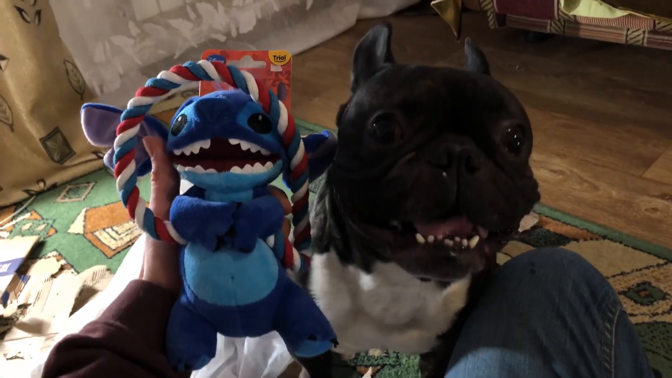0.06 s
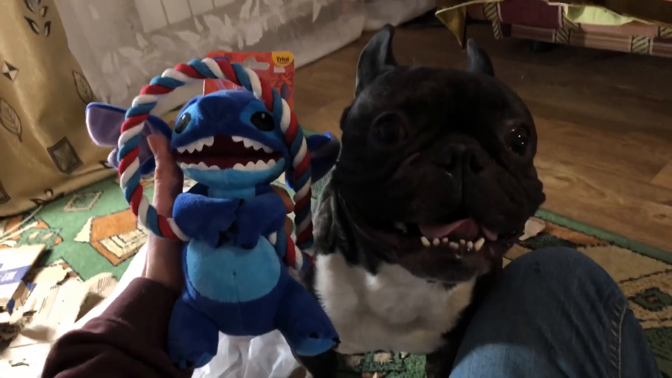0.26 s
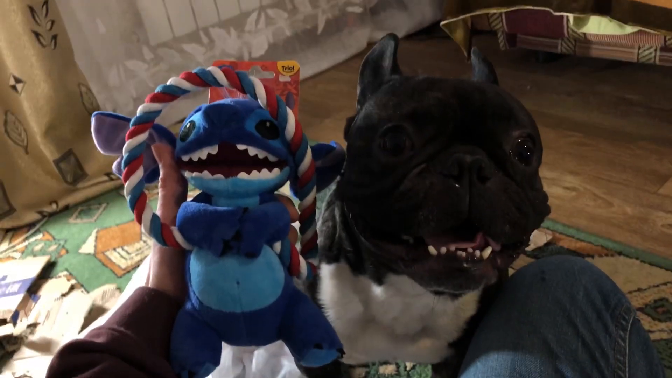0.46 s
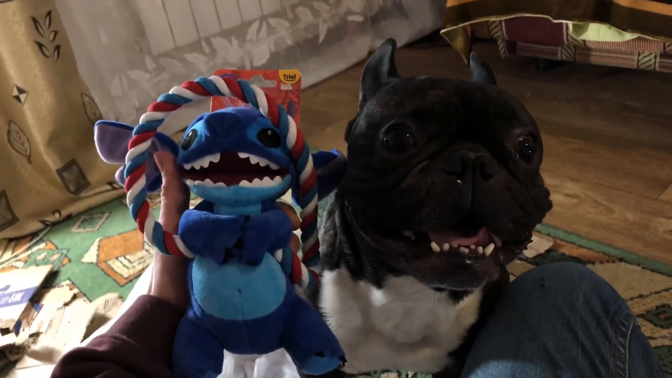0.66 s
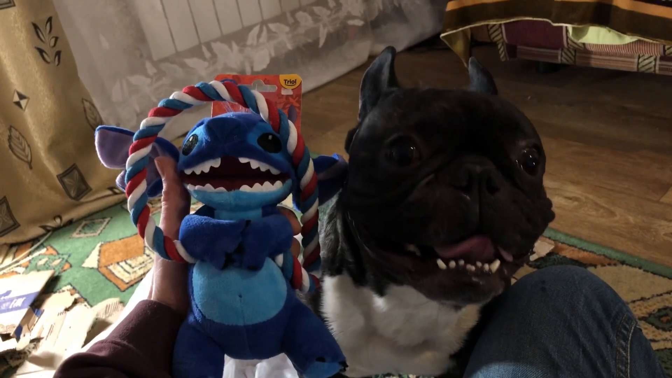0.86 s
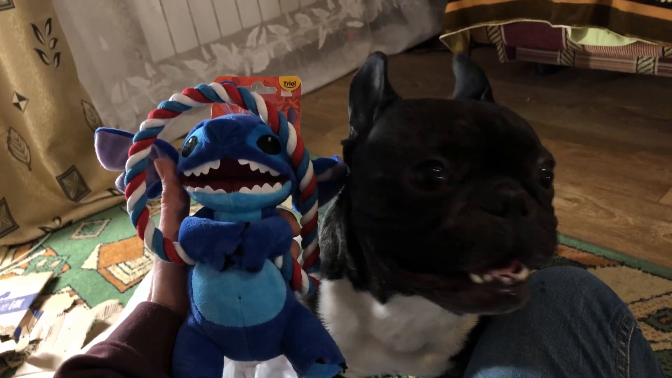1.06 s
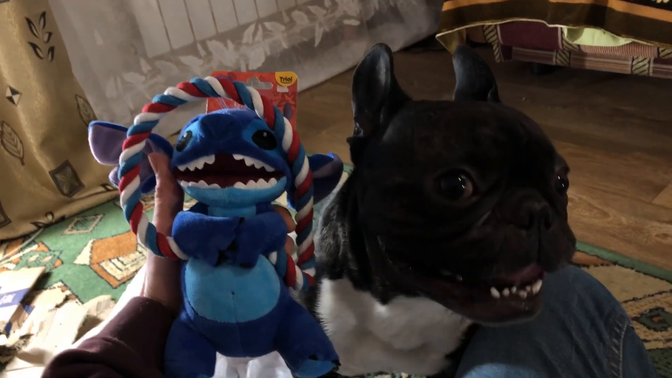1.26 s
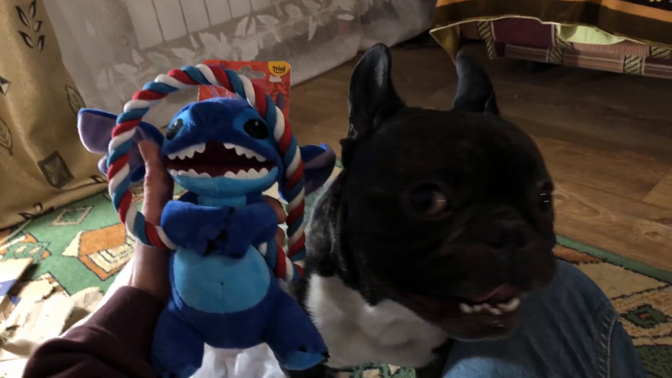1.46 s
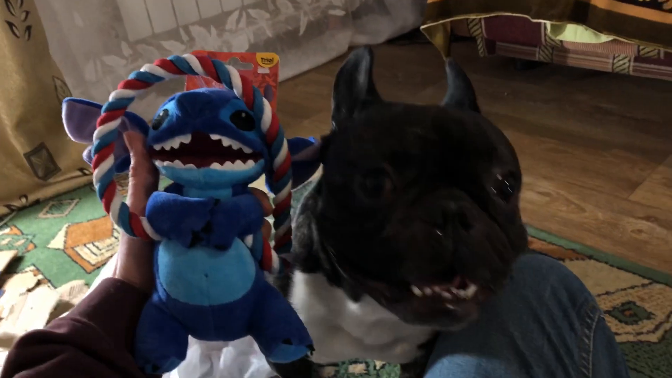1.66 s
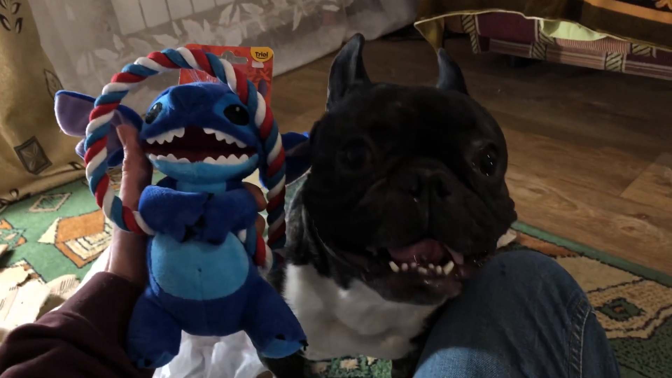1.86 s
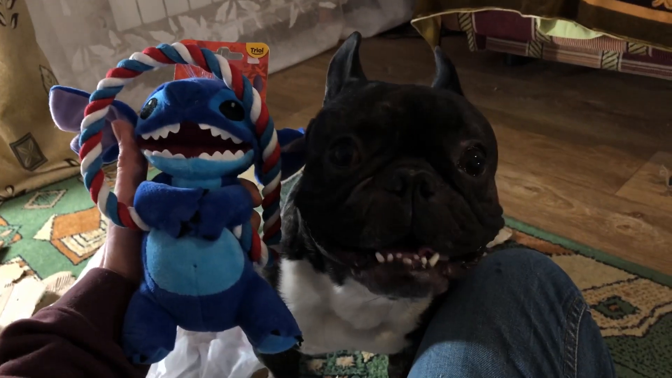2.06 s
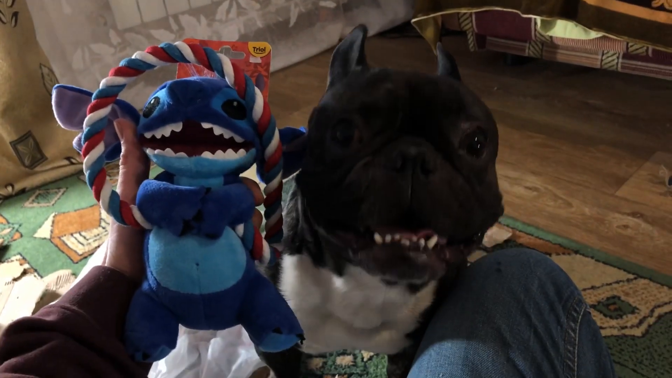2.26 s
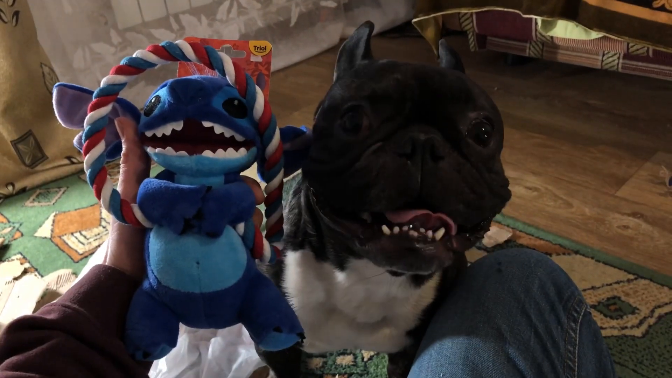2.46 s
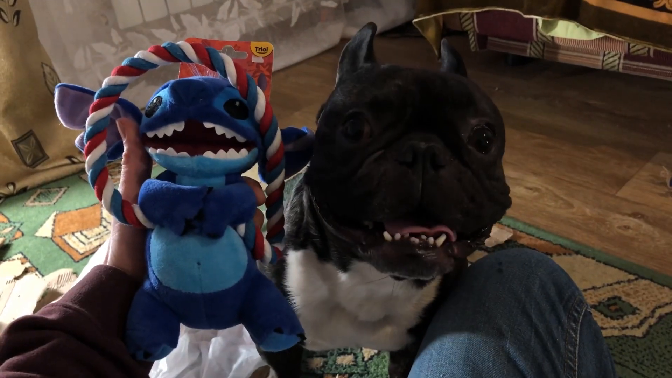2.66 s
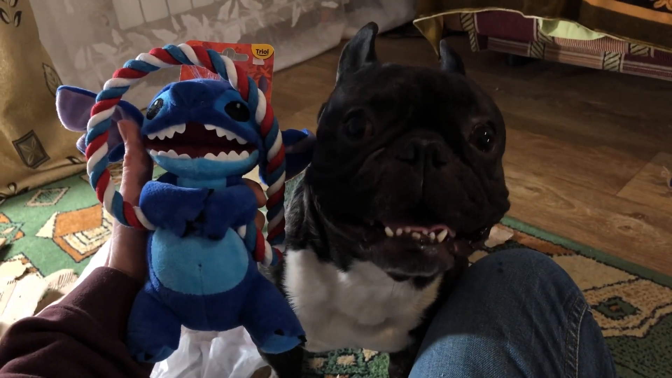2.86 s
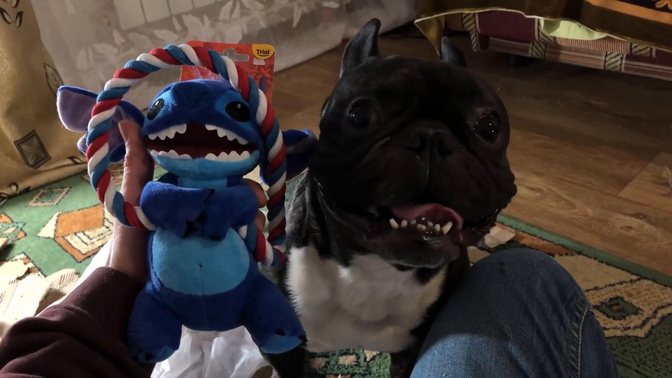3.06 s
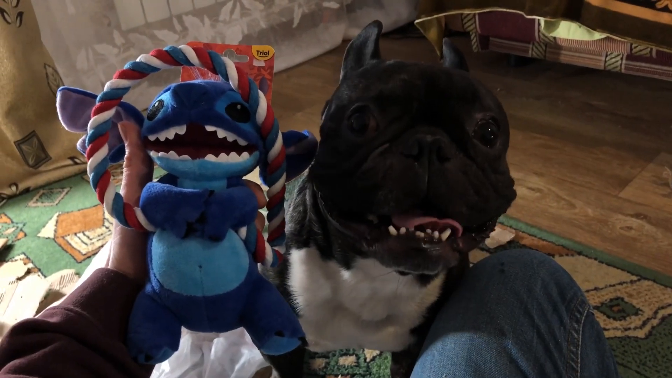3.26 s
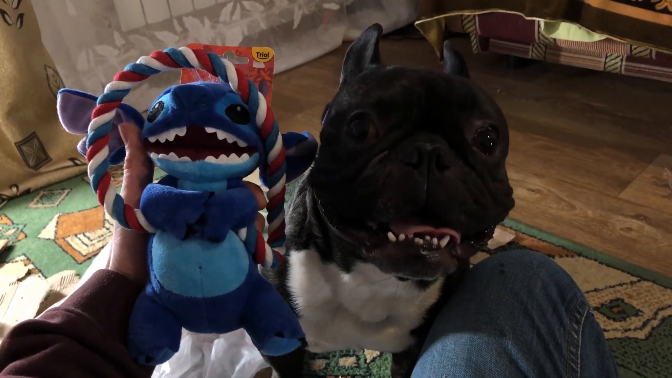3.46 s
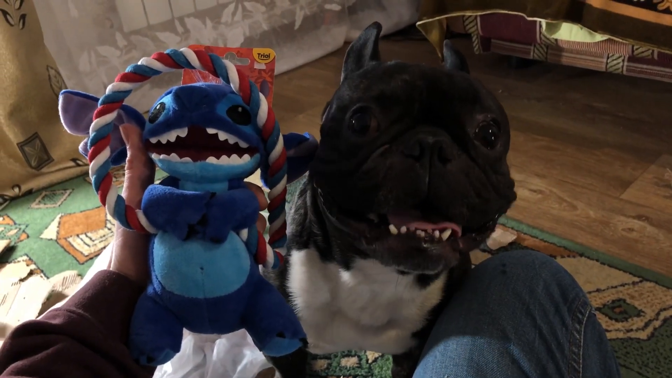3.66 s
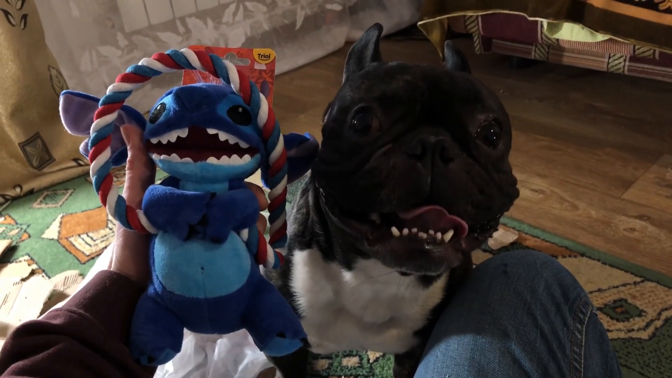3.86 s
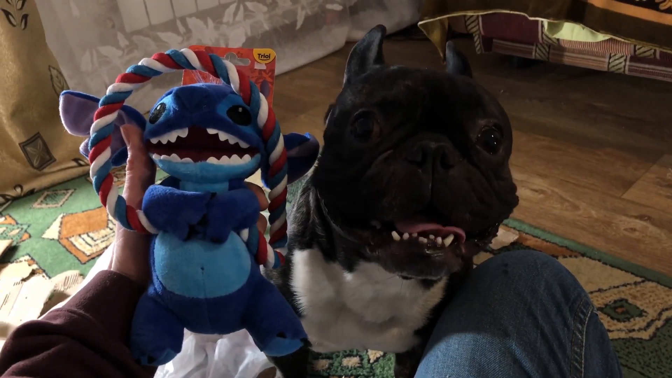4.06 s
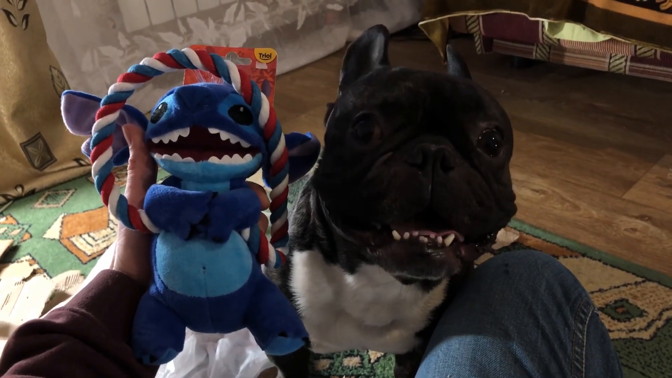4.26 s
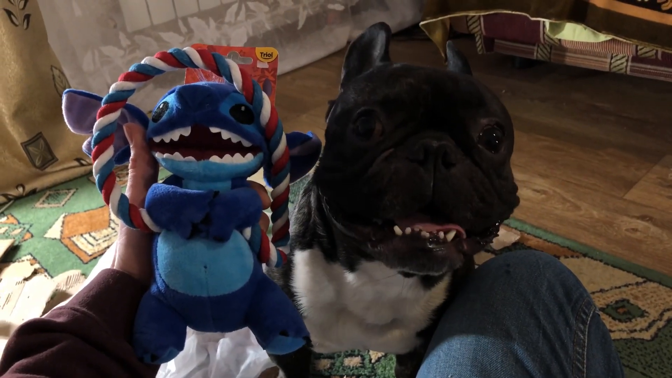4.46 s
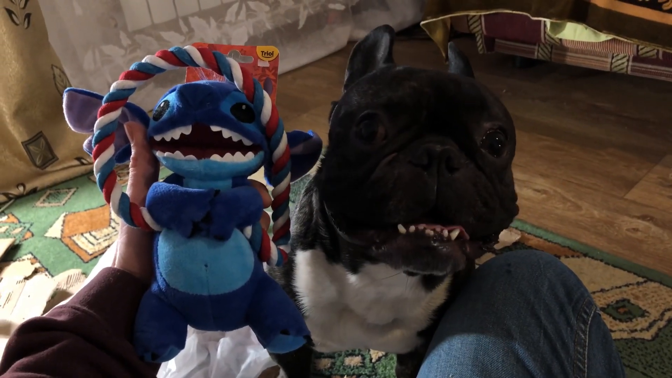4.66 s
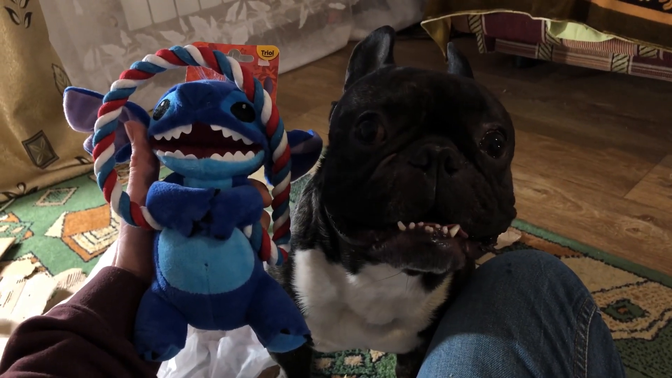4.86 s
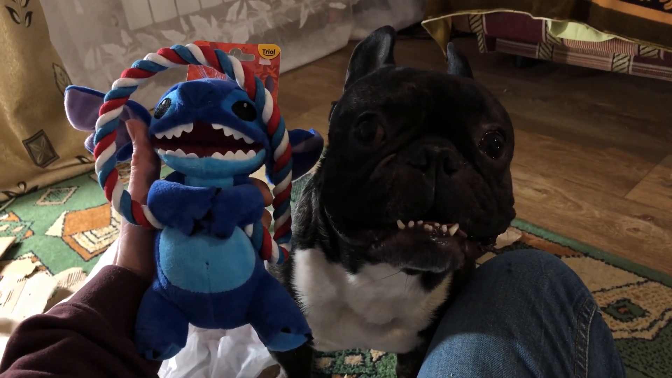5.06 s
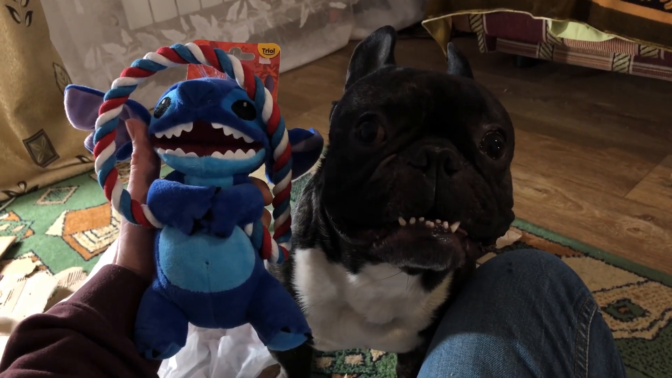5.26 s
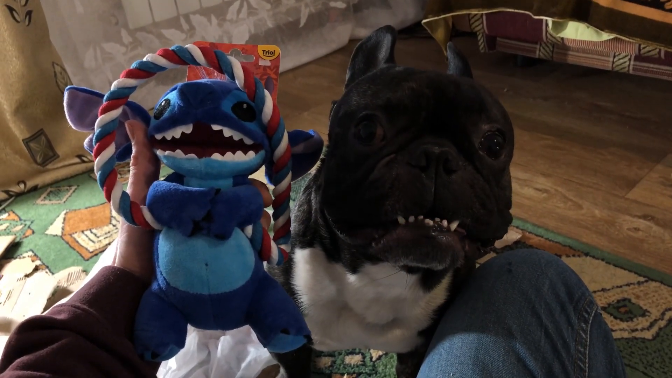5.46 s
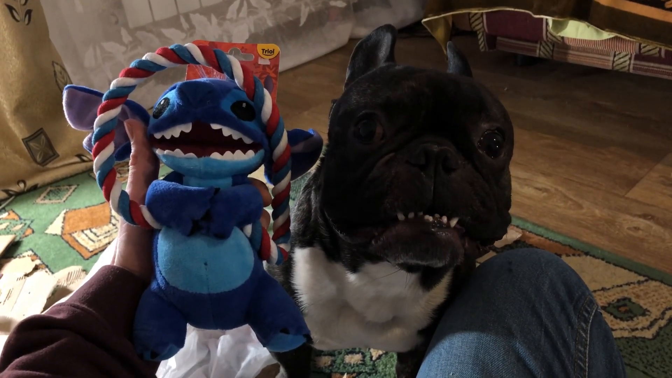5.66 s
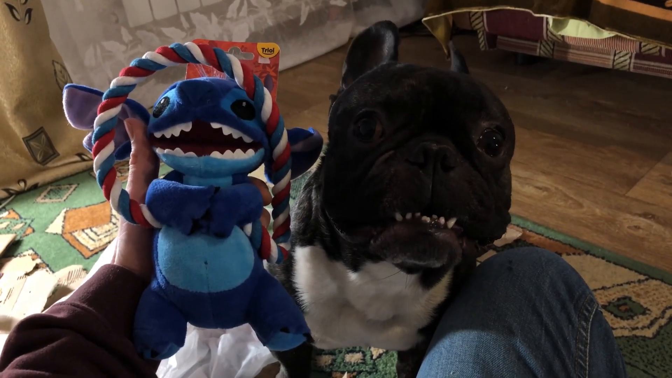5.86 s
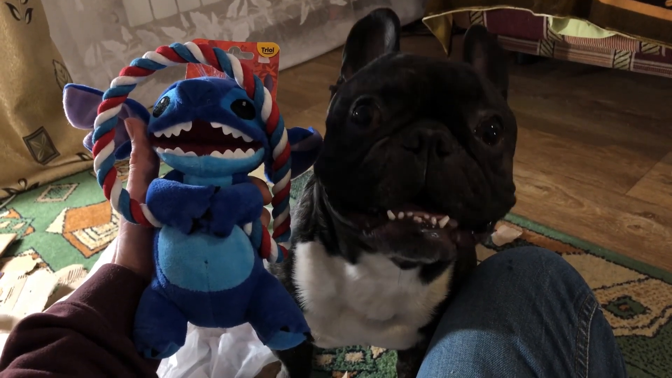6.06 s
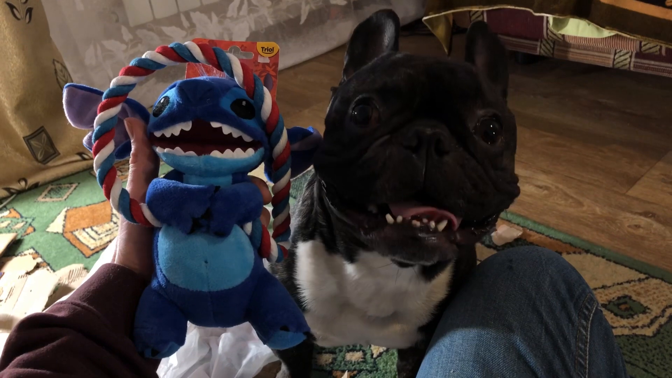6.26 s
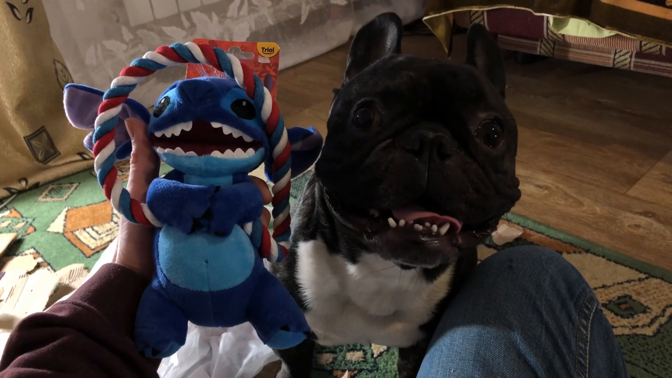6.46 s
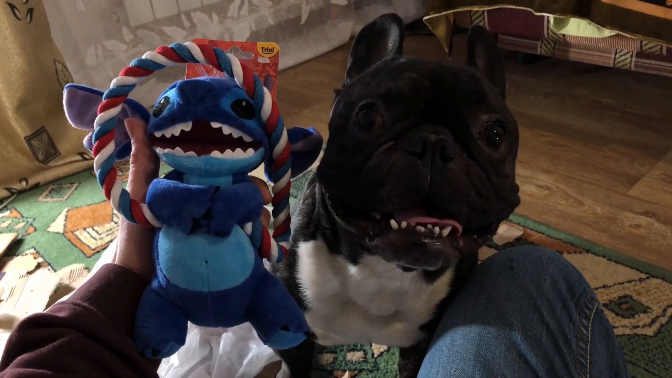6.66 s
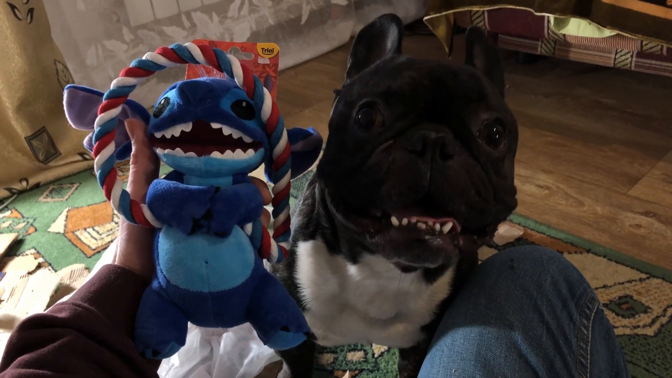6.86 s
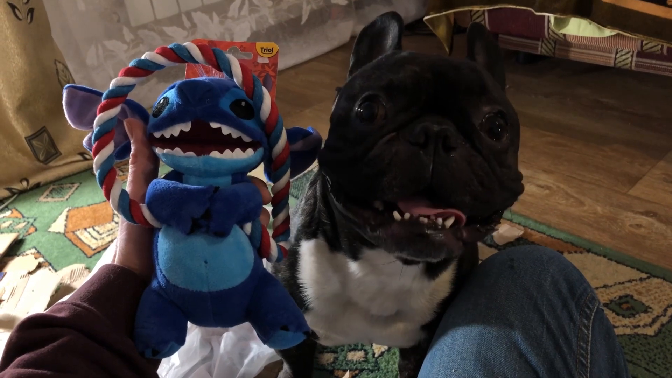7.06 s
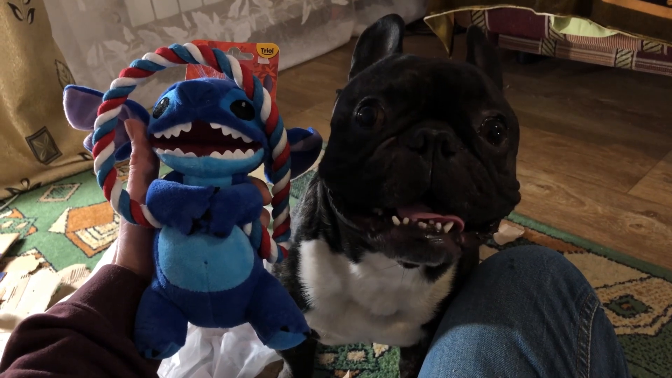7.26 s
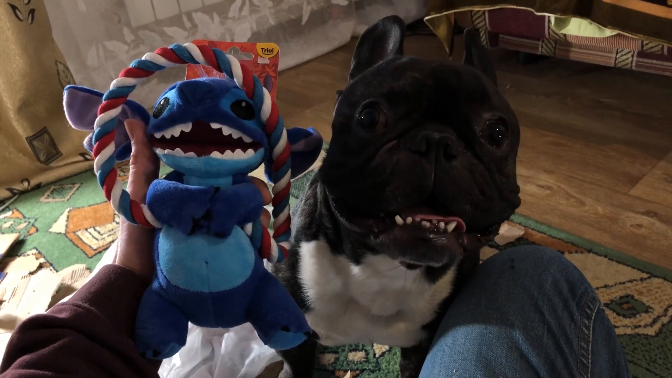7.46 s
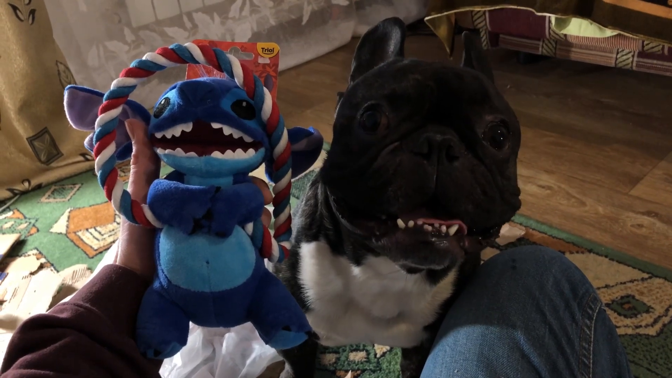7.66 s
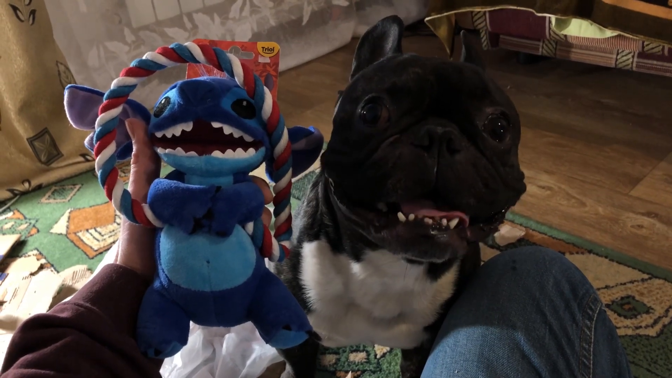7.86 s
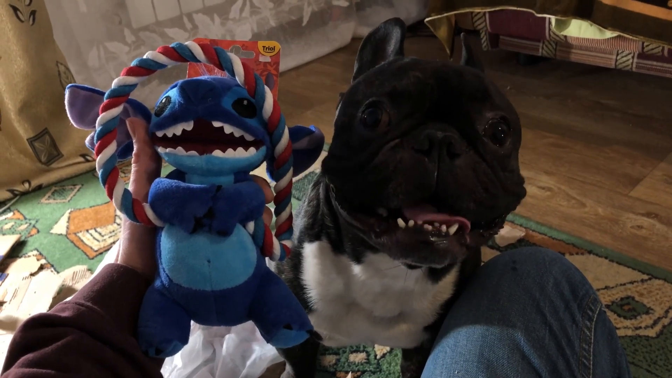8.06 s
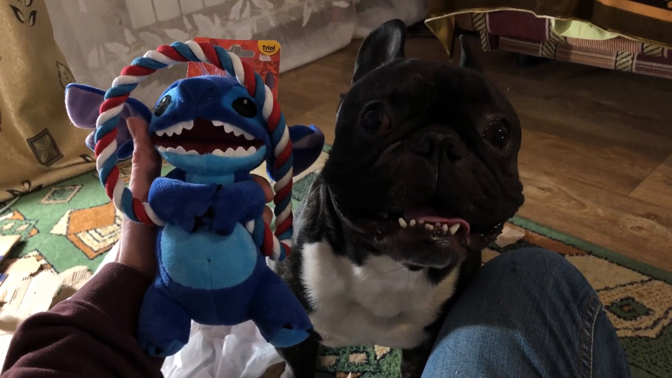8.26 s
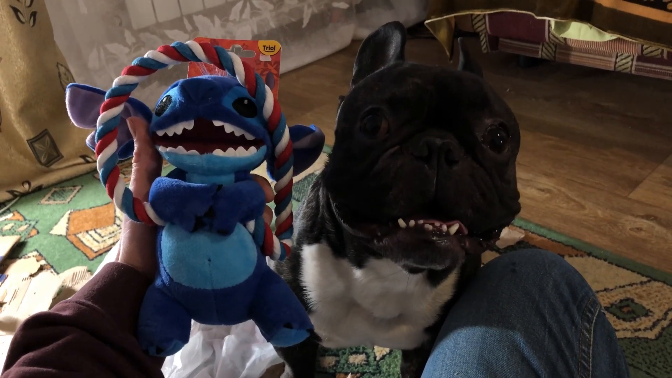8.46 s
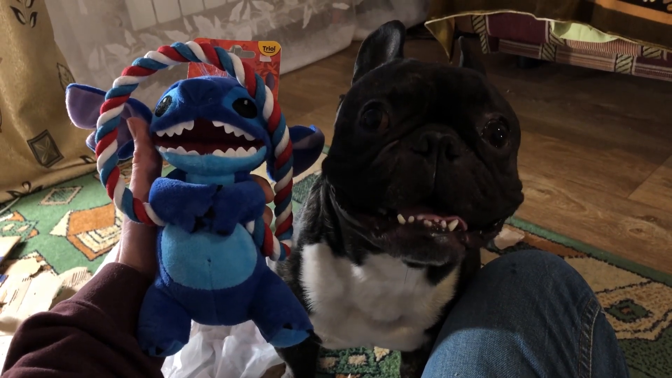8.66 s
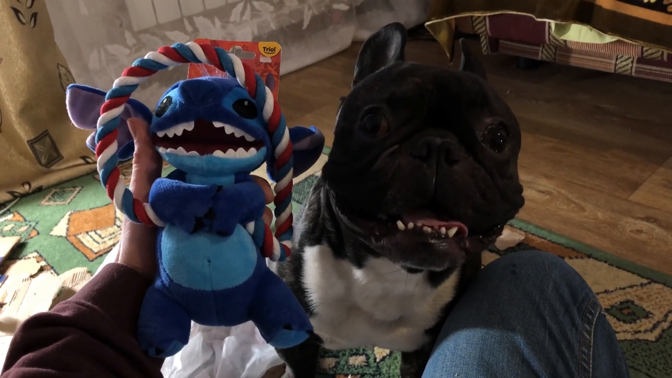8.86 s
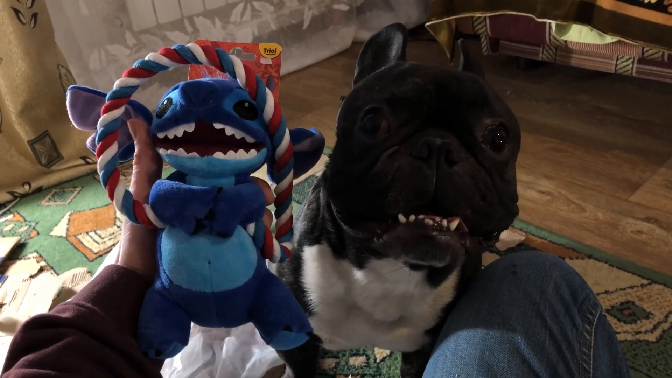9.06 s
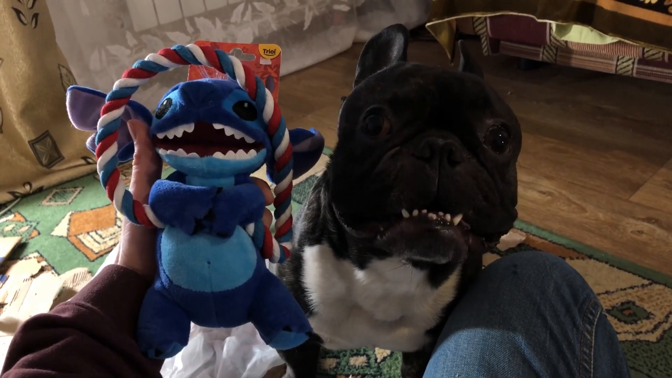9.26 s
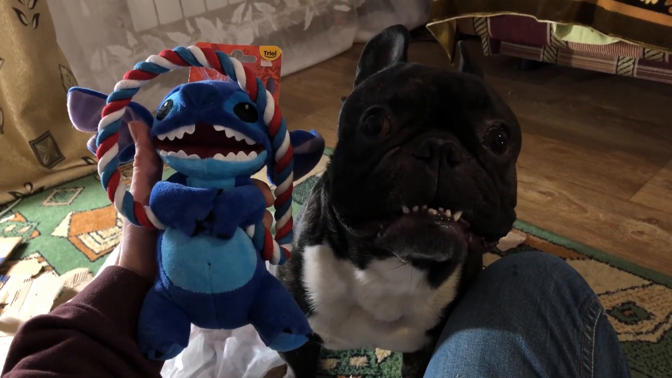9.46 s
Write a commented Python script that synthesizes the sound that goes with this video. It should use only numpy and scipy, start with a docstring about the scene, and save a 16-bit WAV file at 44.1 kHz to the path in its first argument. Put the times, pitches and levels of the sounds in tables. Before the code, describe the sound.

A small flat-faced dog is close to the microphone in a quiet carpeted room with a faint low hum. From the start until about 4.3 seconds it alternates growls and snorts seven times, roughly one pair every 0.6 seconds. Each growl is a short, rough, unpitched throat rattle with wet pops and a fizz of spittle. Each snort is a louder, sharp, fluttering pull of air through the nose. In the pause that follows come two very faint thin whines, at 4.7 and 5.3 seconds, and soft dull bumps around 5.3 and 5.5. A tiny lip click at 5.8 leads straight into a short snort. Softer, slower growls resume at 6 seconds, answered by snorts at about 6.7, 7.6 and 8.4, with two more soft bumps near 7.4. A last brief, weak growl at 8.7 leaves only the room hum.

```python
"""A rough, unpitched growl with wet pops, then a sharp snort: a small flat-faced dog does both by turns,
close to the microphone in a quiet carpeted room. Each growl is air rattling out through the throat;
each snort is a pull of air through the nose, chopped by the flapping soft palate.
In a pause midway come a very faint whine, soft dull bumps and a lip click; then the dog starts again."""
import sys
import numpy as np
from scipy import signal
from scipy.fft import rfft, irfft
from scipy.io import wavfile
from scipy.ndimage import map_coordinates

SR = 44100
rng = np.random.default_rng(int(sys.argv[2]) if len(sys.argv) > 2 else 0)


def put_to_file(sound):
    """Save the sound as 16-bit audio at rate SR, in the file named by the first command-line argument."""
    columns = np.atleast_2d(sound).T  # one column per channel
    safe = np.clip(columns, -1, 1)
    whole_steps = np.round(safe * 32767)
    wavfile.write(sys.argv[1], SR, whole_steps.astype(np.int16))


N = 419832
TIME = np.arange(N) / SR

# one growl a row: (start [s], attack [s], hold [s], end [s], effort [dB], loss as breath runs out [dB],
#   chest share [dB], spittle share [dB], hiss tilt [dB/octave])
GROWLS = [ (0, 0.0042, 0.087, 0.349, -43, 7, -7.5, -17.5, 4),
          (0.573, 0.047, 0.19, .91, -47.5, -1, -9, -20.5, -1),
          (1.12, 0.023, .2, 1.472, -48.5, 1, -6, -18.5, -1.5),
          (1.65, .1, 0.17, 2.003, -49, -10, -12, -19, -3),
          (2.266, 0.033, 0.082, 2.678, -49.5, 1.5, -7.5, -18.5, -2),
          (2.944, 0.039, 0.15, 3.395, -51, 0, -5, -19.5, -0.5),
          (3.636, 0.072, 0.084, 4.078, -46.5, 9.5, -6, -18, -2),
          (6.03, 0.14, 0.31, 6.648, -54.5, 2, -9, -19, -5),
          (6.91, 0.079, 0.19, 7.54, -54.5, 28, -10.5, -16, .5),
          (7.804, .065, 0.089, 8.39, -53, 17, -9, -14, 1),
          (8.676, 0.017, 0.055, 8.85, -55.5, 32, -17, -9.5, 2)]
# resonances of the throat and of the spittle hiss: (frequency [Hz], width [Hz], level [dB])
THROAT = [(510, 99, -7), (912, 660, -13), (1295, 280, -0.5), (1510, 520, -6), (2090, 150, -5.5),
          (2333, 285, 0), (3554, 440, -12), (4367, 450, -9.5)]
SPITTLE = [(5450, 410, 1.5), (6410, 570, 6), (8720, 980, -1), (10150, 1000, -6), (12100, 1900, -6.5),
           (13700, 1300, -12), (12040, 17000, -6.5)]


def gain_of(db):
    """Decibels to amplitude."""
    return 10 ** (np.asarray(db) / 20)


def unit_rms(x):
    """Scales to rms 1."""
    return x / np.sqrt(np.mean(x ** 2) + 1e-20)


def curve_at(points, hz):
    """Interpolates (frequency, value) points on a log-frequency axis."""
    f, value = np.transpose(points)
    return np.interp(np.log(hz + 1), np.log(f + 1), value)


def add(mix, s, sound):
    """Mixes a sound in at s seconds."""
    part = mix[max(round(s * SR), 0):][:len(sound)]
    part += sound[:len(part)]


def ramp(u):
    """A smooth step from 0 to 1 as u goes from 0 to 1."""
    return np.sin(np.pi / 2 * np.clip(u, 0, 1)) ** 2


def wander(t, hz):
    """A smooth random drift of about unit size that changes hz times a second."""
    knots = rng.standard_normal(2048)
    return map_coordinates(knots, [(t - t[0]) * hz + 2], order=3, mode="wrap")


def cavity(x, modes, size=8192, low_hz=63):
    """Rings a cavity: a minimum-phase filter of unit energy with a steep hump for each resonance."""
    hz = abs(np.fft.fftfreq(size, 1 / SR))
    power = sum(gain_of(db) ** 2 / (1 + ((hz - f) / (0.55 * width)) ** 2) ** 2 for f, width, db in modes)
    power = power * hz ** 6 / (hz ** 6 + low_hz ** 6)
    log_gain = np.log(power + 1e-10) / 2
    ring = np.fft.ifft(np.exp(np.conj(signal.hilbert(log_gain)))).real[:size // 2]
    return signal.oaconvolve(x, ring / np.linalg.norm(ring))[:len(x)]


def moving_cavity(x, modes, opening, stretch=0.027):
    """Crossfades from lowered to raised resonances as the opening goes from -1 to 1."""
    low, middle, high = (cavity(x, [(f * tuning, width, db) for f, width, db in modes])
                         for tuning in (1 - stretch, 1, 1 + stretch))
    mixed = np.maximum(-opening, 0) * low + (1 - abs(opening)) * middle + np.maximum(opening, 0) * high
    return unit_rms(mixed) * np.std(middle)


def resonate(x, hz, width):
    """One gliding resonance: shift hz down to zero, smooth twice, shift back."""
    carrier = np.exp(2j * np.pi * np.cumsum(hz) / SR)
    pole = np.exp(-np.pi * width / SR)
    smooth = signal.lfilter([(1 - pole) ** 2], [1, -2 * pole, pole * pole], x / carrier)
    return 2 * np.sqrt(2 / (1 - pole)) * (carrier * smooth).real


def tilted(modes, tilt_db, tension=1, pivot_hz=9000):
    """The same resonances, brighter by tilt_db per octave and retuned by tension."""
    return [(f * tension, width, db + tilt_db * np.log2(f / pivot_hz)) for f, width, db in modes]


def flaps(turns, sharpness):
    """Once a turn, air swells through the opening tissue and is cut off as it slaps shut."""
    phase = 2 * np.pi * (turns + 0.025)
    gate = np.exp(sharpness * (np.cos(phase - 0.65 * np.cos(phase) + 0.48) - 1))
    slaps = np.diff(np.floor(np.maximum.accumulate(turns)), prepend=np.floor(turns[0]))
    return gate, slaps


def wet_air(t, crackle_db, grain_hz):
    """Turbulence broken into tiny bursts by moisture."""
    return unit_rms(rng.standard_normal(len(t)) * gain_of(crackle_db * wander(t, grain_hz)))


def room_tone(noise_db=-71.5):
    """Behind the dog throughout: the low noise of the room and a faint wavering hum."""
    # spectrum of the room noise: (frequency [Hz], relative density [dB])
    spectrum = [(15, -30.5), (35, -15.5), (62, -1.5), (90, -4.5), (125, -9.5), (165, -12.5), (215, -6.5),
                (270, -12.5), (550, -16.5), (750, -20), (1100, -21.5), (2000, -27), (5000, -31.5),
                (15500, -36.5)]
    # tones of the hum: (frequency [Hz], level [dB])
    tones = [(69, -80.5), (138, -78), (194, -79)]
    hum = sum(gain_of(db) * unit_rms(np.sin(2 * np.pi * hz * TIME + 0.49 * wander(TIME, 8.8)))
              for hz, db in tones)
    colour = gain_of(curve_at(spectrum, np.fft.rfftfreq(N, 1 / SR)))
    noise = irfft(rfft(rng.standard_normal(N)) * colour, N)
    return hum + gain_of(noise_db) * unit_rms(noise)


def breath_out(start, attack_s, hold_s, end, effort_db, lost_db, chest_db, spittle_db):
    """The breath behind one growl swells, holds, settles and is cut off; grunts push it harder."""
    # grunts within the growls: (middle [s], length [s], extra effort [dB], extra chest rumble [dB])
    grunts = [(0.201, 0.058, 5.5, 5), (0.31, 0.051, 3, 0), (0.69, 0.076, 3, 7), (0.872, 0.087, 6.5, 5.5),
              (1.206, 0.1, 2, 8), (1.352, 0.022, 3.5, -2.5), (1.437, 0.058, 5.5, 3.5), (1.775, 0.039, 2, 9),
              (2.375, 0.035, 1, 10.5), (3.039, 0.038, 4, 8), (3.259, 0.048, 5.5, 4.5),
              (3.34, 0.13, 6.5, 0.5), (3.78, 0.041, 3, 2.5), (3.925, 0.058, -1.5, 10.5),
              (6.216, .04, -1, 6)]
    settle_s, release_s = 0.2, 0.03
    chest_db_per_s, spittle_db_per_s = 11.5, 14  # both gain on the throat as the growl goes on
    t = np.arange(max(start, 0), end, 1 / SR)
    age, from_middle = t - start, t - (start + end) / 2
    spent = 1 - np.exp(-np.maximum(age - attack_s - hold_s, 0) / settle_s)
    pushes = [np.outer(extra_db, np.exp(-(2 * (t - s) / length_s) ** 2))
              for s, length_s, *extra_db in grunts if start < s < end]
    push_db, rumble_db = sum(pushes, np.zeros((2, len(t))))
    envelope = ramp(age / attack_s) * ramp((end - t) / release_s)
    effort = envelope * gain_of(effort_db - lost_db * spent + push_db)
    chest_share = gain_of(chest_db + chest_db_per_s * from_middle + rumble_db)
    spittle_share = gain_of(spittle_db + spittle_db_per_s * from_middle + 0.83 * push_db)
    return t, effort, chest_share, spittle_share


def growls(rattle_hz=48, unevenness=0.4, leak=0.22, sigh_below_db=-62, flicker_db=2):
    """Slack throat tissue rattles unevenly on the way out, with chest rumble and a fizz of spittle."""
    # resonances of the chest and of the open mouth: (frequency [Hz], width [Hz], level [dB])
    chest_modes = [(75.9, 47, 0.5), (136.6, 42, 2.5), (219.5, 110, -11.5), (379.5, 380, -17)]
    mouth_modes = [(1345, 176, -1), (1490, 280, -6), (2400, 240, -11)]
    throat, chest, spittle, sigh = np.zeros((4, N))
    tongue = np.tanh(wander(TIME, 11))  # the tongue shifts and retunes the throat
    for *breath, tilt_db in GROWLS:
        t, effort, chest_share, spittle_share = breath_out(*breath)
        turns = np.cumsum(rattle_hz * np.exp(unevenness * wander(t, 55))) / SR
        gate, slaps = flaps(turns, sharpness=1.1)
        strength = gain_of(2.05 * wander(t, 44))
        air = unit_rms(leak + gate * strength) * wet_air(t, crackle_db=1.9, grain_hz=298.6)
        # weak flow fails to shake the tissue and only sighs through the mouth
        rattling = effort ** 2 / (effort ** 2 + gain_of(sigh_below_db) ** 2)
        shaking = effort * np.sqrt(rattling)
        add(throat, t[0], shaking * air)
        add(sigh, t[0], effort * np.sqrt(1 - rattling) * rng.standard_normal(len(t)))
        add(chest, t[0], effort * chest_share * (0.31 * unit_rms(slaps * strength) + 1.03 * air))
        wetness = spittle_share * gain_of(flicker_db * wander(t, 29.8))  # spittle gathers and clears
        fizz = shaking * wetness * (1.2 * air + 0.25 * rng.standard_normal(len(t)))
        add(spittle, t[0], moving_cavity(fizz, tilted(SPITTLE, tilt_db), np.interp(t, TIME, tongue)))
    voice = gain_of(-1.5) * moving_cavity(throat, THROAT, tongue) + cavity(sigh, mouth_modes)
    return voice + cavity(chest, chest_modes, low_hz=79) + gain_of(-3.5) * spittle


def small_pops(per_s=14, spread_db=2.3):
    """Random pops during the growls, stronger with effort: rows of (time [s], thud [dB], smack [dB])."""
    effort = np.zeros(N)
    for *breath, _ in GROWLS:
        t, push, _, _ = breath_out(*breath)
        add(effort, t[0], push)
    at = np.flatnonzero((rng.random(N) < per_s / SR) & (effort > 0))
    db = 20 * np.log10(effort[at, None]) + spread_db * rng.standard_normal((len(at), 2))
    return list(zip(at / SR, db[:, 0] - 5, db[:, 1] + 2.5))


def pops(rise_s=0.0017, decay_s=0.0028, spray_db=-24):
    """The throat snaps open: a low thud with a brief gurgle, a wet smack and a little spray."""
    # the main wet pops: (time [s], relative thud level [dB], relative smack level [dB])
    main_pops = [(.083, -37.5, -38.5), (.119, -36.5, -42), (.209, -36, -40.5), (0.285, -36.5, -47),
                 (.693, -29.5, -34.5), (0.837, -37.5, -34.5), (.867, -34.5, -39.5), (1.202, -39.5, -36),
                 (1.341, -48, -34), (1.355, -32.5, -39), (1.425, -35.5, -47), (1.486, -33.5, -37),
                 (1.789, -60.5, -41.5), (1.827, -63, -41), (1.898, -48, -37.5), (1.96, -59, -38.5),
                 (2.39, -59.5, -40), (3.054, -40, -41.5), (3.296, -37.5, -40), (3.781, -46, -39.5),
                 (6.059, -70, -46.5), (6.215, -45, -42.5), (6.281, -55, -46), (6.314, -47, -39.5),
                 (6.348, -47, -42), (6.381, -52, -43), (6.415, -44.5, -41), (6.51, -42.5, -41),
                 (6.922, -72, -50), (7.055, -63, -45), (7.141, -42.5, -45.5), (7.162, -69, -52),
                 (7.946, -67, -45)]
    # resonances of the thud: (frequency [Hz], width [Hz], level [dB])
    thud_modes = [(127, 58, 10), (244, 190, -2.5), (366, 150, -4), (460, 120, 2.5), (860, 190, -14)]
    thud, smack = np.zeros((2, N))
    t = np.arange(1024) / SR
    burst = (1 - np.exp(-(t / rise_s) ** 2)) * np.exp(-t / decay_s)
    burst /= burst.max()
    for s, thud_db, smack_db in main_pops + small_pops():
        add(thud, s + 0.00053, gain_of([thud_db + 18]))  # the snap is a single impulse
        gurgle = 0.25 * gain_of(thud_db + 5.5) * burst * rng.standard_normal(len(t))
        add(thud, s - 0.002, gurgle)
        add(smack, s - 0.002, gain_of(smack_db - 1) * burst * rng.standard_normal(len(t)))
    return cavity(thud, thud_modes) + cavity(smack, THROAT) + gain_of(spray_db) * cavity(smack, SPITTLE)


def snorts():
    """The soft palate chops the intake; the bursts ring the nose and hiss at the nostrils."""
    # one snort a row: (start [s], attack [s], hold [s], flow [dB], upper nose share [dB],
    #   hiss share [dB], hiss tilt [dB/octave], thump share [dB], base tuning of the honk [Hz],
    #   time of one flap [s], flap rate [Hz], flutter depth [0-1], whistle share [dB], tension [factor])
    intakes = [ (0.356, 0.033, 0.11, -32, -1, -11.5, -3, -8, 1440, .419, 59, 0.85, -16, 1.01),
               (0.913, 0.035, 0.08, -33.5, 0, -11.5, 2, -9, 1454, .99, 48, 0.91, -11, 0.97),
               (1.482, 0.038, 0.075, -33.5, -1.5, -13.5, 1, -9.5, 1430, 1.532, 50.5, 0.86, -10, 1.06),
               (2.025, 0.037, 0.092, -34, -1, -11.5, -1, -7, 1395, 2.11, 53.5, 0.88, -12.5, 0.98),
               (2.691, 0.036, 0.096, -36, 0, -9, -1.5, -9, 1440, 2.762, 48.5, 0.83, -19, 1),
               (3.399, 0.034, 0.098, -35, 1, -10, -2, -6.5, 1470, 3.477, 42.5, 0.76, -20, 1.02),
               (4.086, 0.024, 0.11, -35.5, -1, -11.5, -0.5, -8, 1384, 4.135, 56, 0.86, -19, 1.01),
               (5.842, 0.029, 0.06, -50, 0, -5, -2, -14.5, 1550, 5.87, 40, 0, -29, 0.96),
               (5.905, 0.024, 0.038, -35.5, -3.5, -13.5, 3, -15.5, 1390, 5.946, 30, 0.56, -26, .987),
               (6.668, 0.041, 0.12, -38.5, 0, -9, .5, -7.5, 1436, 6.752, 45.5, 0.87, -24, 0.96),
               (7.549, .038, 0.1, -38.5, 1, -7.5, .5, -6, 1515, 7.604, 41.5, 0.8, -18, 0.98),
               (8.388, 0.036, 0.099, -37.5, -0.5, -8, -1.5, -8.5, 1430, 8.468, 42, 0.92, -17, 0.96)]
    # resonances along the airway: (frequency [Hz], width [Hz], level [dB])
    nose_modes = [(835, 190, -17), (1316, 303, -5.5), (1910, 350, -15)]
    upper_nose_modes = [(2300, 1030, 4), (2940, 317, -6.5), (3404, 710, 2), (3850, 1200, -7.5),
                        (4730, 530, 0)]
    nostril_modes = [(5566, 140, 0), (6380, 420, -4.5), (6920, 880, -4), (8800, 1100, -3.5),
                     (9620, 1300, -5.5), (11670, 1780, -8.5), (14230, 2200, -12.5)]
    pinched_nostril_modes = [(3826, 377, 2.5), (6100, 350, -0.5)]
    palate_modes = [(79.8, 40, -12), (138.2, 41.5, 3), (219, 85, -15.5), (390, 160, -15), (483, 204, -9.5),
                    (630, 55, -12.5)]
    arch_db, sag_db_per_s, release_s, tail_s = 2.5, 25, 0.024, 0.09
    flutter_build_s, flutter_settle_s = 0.024, 0.06
    hiss_db_per_s, thump_linger_db_per_s = 32, 59
    nose, upper, whistle, hiss, thump, honk = np.zeros((6, N))
    for (start, attack_s, hold_s, flow_db, upper_db, hiss_db, tilt_db, thump_db,
         honk_hz, flap_s, flap_hz, depth, whistle_db, tension) in intakes:
        t = np.arange(0, attack_s + hold_s + tail_s, 1 / SR)
        released = np.maximum(t - attack_s - hold_s, 0)
        from_middle = t - attack_s - hold_s / 2
        # the flow arches, sags, then dies away ever faster
        arch = 0.5 - np.minimum((2 * from_middle / hold_s) ** 2, 1)
        flow = ramp(t / attack_s) * np.exp(-(released / release_s) ** 1.8)
        flow *= gain_of(flow_db - sag_db_per_s * (t - attack_s) + arch_db * arch)
        # the palate takes a moment to get flapping and settles as the flow dies
        turns = (start + t - flap_s) * flap_hz + 0.035 * wander(t, 35)
        gate, slaps = flaps(turns, sharpness=2.9)
        flutter = depth * (1 - np.exp(-t / flutter_build_s)) * np.exp(-released / flutter_settle_s)
        leak = 1.15 - flutter
        chop = leak + flutter * gate
        chop /= np.sqrt((leak + flutter * gate.mean()) ** 2 + flutter ** 2 * gate.var())  # even power
        bursts = flow * chop
        ring_hz = 1.048 * (honk_hz + 500 * from_middle + 60 * wander(t, 34.5))  # rises and wobbles
        add(nose, start, bursts * rng.standard_normal(len(t)))
        add(upper, start, gain_of(upper_db) * bursts * wet_air(t, crackle_db=3, grain_hz=718))
        add(whistle, start, gain_of(whistle_db) * bursts * rng.standard_normal(len(t)))
        add(honk, start, resonate(bursts * rng.standard_normal(len(t)), ring_hz, width=200))
        # the nostrils flare and narrow, which shifts the colour of their hiss
        nostrils = tilted(nostril_modes, tilt_db, tension)
        hiss_share = gain_of(hiss_db + hiss_db_per_s * (from_middle - released) - 0.4 * arch)
        jet = flow * hiss_share * unit_rms(chop ** 0.78) * wet_air(t, crackle_db=2.4, grain_hz=918)
        add(hiss, start, moving_cavity(jet, nostrils, opening=np.tanh(wander(t, 25))))
        beat = 0.65 * unit_rms(slaps) + 1.11 * chop * rng.standard_normal(len(t))
        add(thump, start, flow * gain_of(thump_db + thump_linger_db_per_s * released) * beat)
    ringing = gain_of(-5.5) * (cavity(nose, nose_modes) + cavity(upper, upper_nose_modes))
    nostril_air = cavity(whistle, pinched_nostril_modes) + gain_of(-0.5) * hiss
    return gain_of(-4) * honk + ringing + nostril_air + gain_of(-3) * cavity(thump, palate_modes)


def whines():
    """A very faint thin tone glides and wavers in the pause."""
    # one list of points a whine: (time [s], level [dB], pitch [Hz])
    contours = [
        [(4.66, -87, 635), (4.72, -72, 554), (4.77, -89, 490)],
        [(5.25, -81.5, 400), (5.31, -75.5, 417), (5.4, -73, 383), (5.47, -86, 353)],
    ]
    out = np.zeros(N)
    for points in contours:
        s, db, hz = np.transpose(points)
        t = np.arange(round(s.min() * SR), round(s.max() * SR)) / SR
        envelope = signal.windows.tukey(len(t), 0.04) * gain_of(np.interp(t, s, db))
        pitch = np.interp(t, s, hz) * (1 + 0.031 * wander(t, 90.4))
        add(out, t[0], envelope * unit_rms(np.sin(2 * np.pi * np.cumsum(pitch) / SR)))
    return out


def bumps(width_s=0.017):
    """Soft dull bumps, each a few cycles of a low tone."""
    # one bump a row: (time [s], level [dB], frequency [Hz])
    pulses = [(5.261, -61.5, 60.7), (5.499, -54.5, 57.8), (7.361, -58, 65.4), (7.499, -52, 63.6)]
    out = np.zeros(N)
    t = np.arange(-SR // 10, SR // 10) / SR
    for s, db, hz in pulses:
        add(out, s + t[0], gain_of(db) * np.exp(-(t / width_s) ** 2) * np.cos(2 * np.pi * hz * t))
    return out


def lip_click(decay_s=0.00056):
    """The lips make a tiny burst of noise."""
    # the click: (time [s], level [dB])
    clicks = [(5.827, -44)]
    out = np.zeros(N)
    t = np.arange(512) / SR
    for s, db in clicks:
        add(out, s, gain_of(db) * rng.standard_normal(len(t)) * np.exp(-t / decay_s))
    return out


def carpeted_room(x, early_db=-16, early_s=0.0037, tail_db=-16, modes_db=-9, echoes_per_s=2000):
    """Close up the direct sound leads, over weak reflections, a short tail and a few lingering modes."""
    # decay of the tail: (frequency [Hz], time to fall 60 dB [s])
    decay_times = [(100, 0.54), (400, 0.7), (1200, 0.3), (1550, 0.37), (2100, 0.33), (2700, 0.26),
                   (3100, 0.51), (3700, 0.28), (6200, 0.37), (12000, 0.26)]
    # room modes: (frequency [Hz], width [Hz], relative level [dB])
    modes = [(69.2, 7, -5), (116.8, 11, -4.5), (141, 5.4, -4.5), (1340, 2.4, -3), (1550, 4, -0.5),
             (3050, 5, 11)]
    t = np.arange(SR // 2) / SR
    taps = rng.choice([-1., 1.], len(t)) * (rng.random(len(t)) < echoes_per_s / SR) * (t > 0.003)
    early = taps * np.exp(-t / early_s)
    hz, frame_s, bands = signal.stft(rng.permutation(taps) * (t > 0.008), SR, nperseg=256)
    decay = gain_of(-60 * frame_s / curve_at(decay_times, hz)[:, None])
    tail = signal.istft(bands * decay, SR, nperseg=256)[1][:len(t)]
    response = gain_of(early_db) * early / np.linalg.norm(early)
    response += gain_of(tail_db) * tail / np.linalg.norm(tail)
    for f, width, db in modes:
        ring = np.exp(-np.pi * width * t) * np.sin(2 * np.pi * f * t)
        response += gain_of(modes_db + db) * 2 * np.pi * width / SR * ring
    return x + signal.oaconvolve(x, response)[:N]


def scene():
    """One microphone close to the dog in the quiet room."""
    direct = snorts() + growls() + pops() + whines() + bumps() + lip_click()
    return (carpeted_room(direct) + room_tone())[None]


def record(dry):
    """The recorder cuts off the highest treble."""
    edge_hz = 15850
    lowpass = signal.firwin(511, edge_hz, window=("kaiser", 9), fs=SR)
    return signal.oaconvolve(dry, lowpass[None], "same")


dry = scene()
out = record(dry)
put_to_file(out)
```